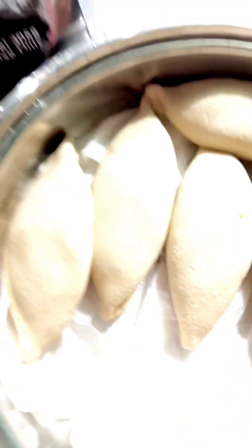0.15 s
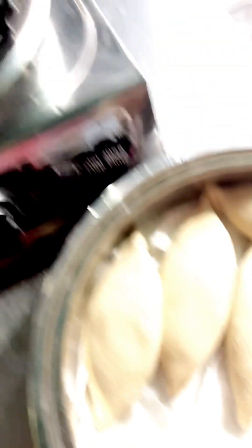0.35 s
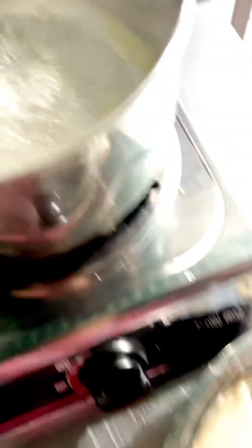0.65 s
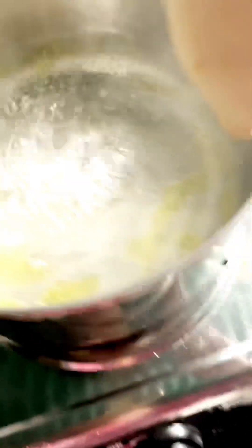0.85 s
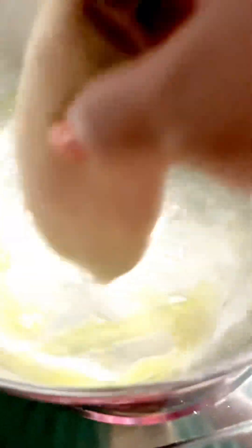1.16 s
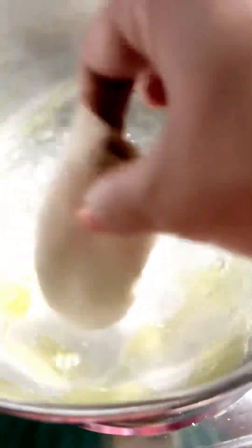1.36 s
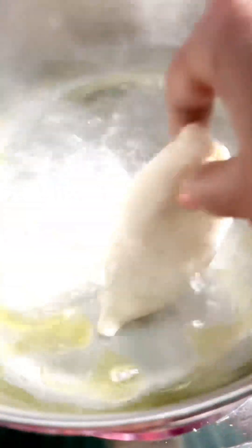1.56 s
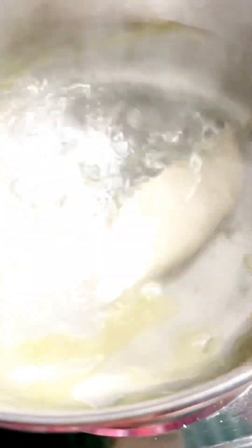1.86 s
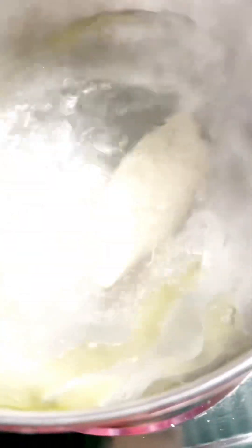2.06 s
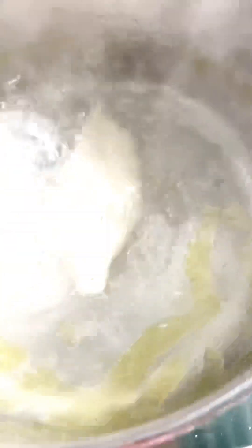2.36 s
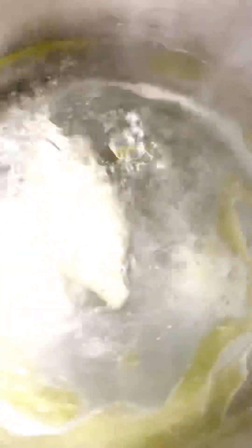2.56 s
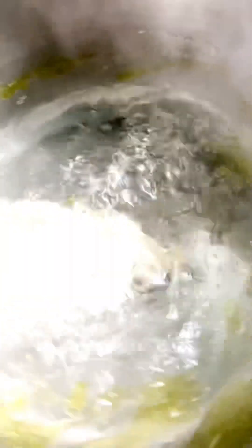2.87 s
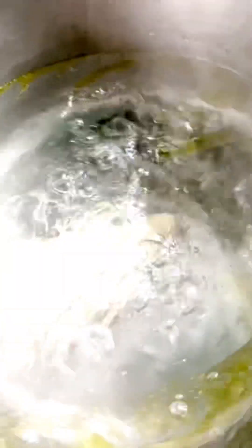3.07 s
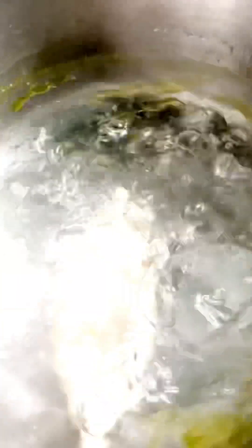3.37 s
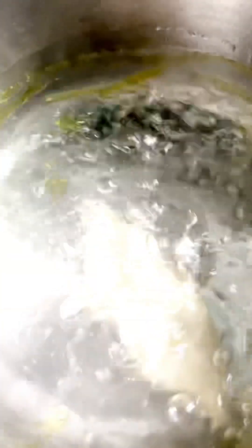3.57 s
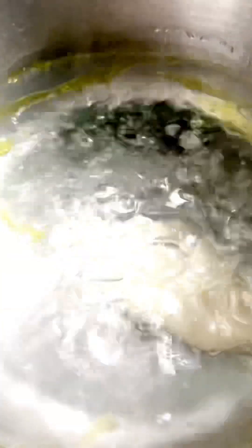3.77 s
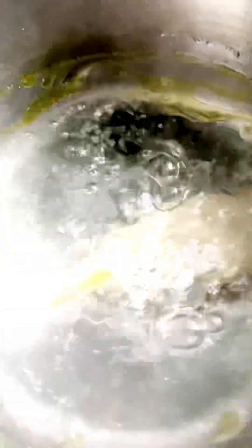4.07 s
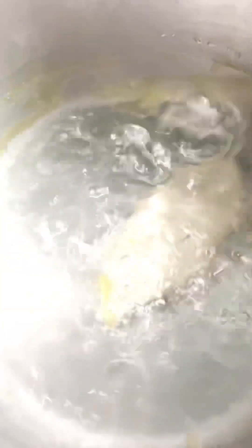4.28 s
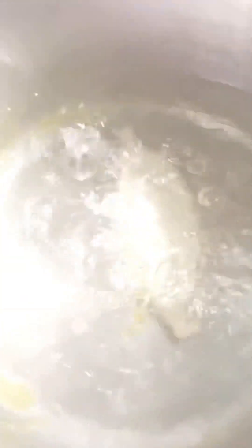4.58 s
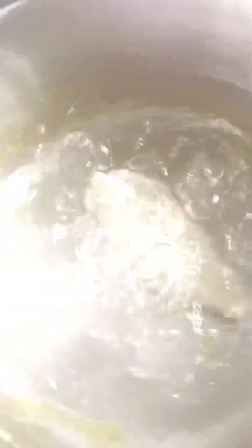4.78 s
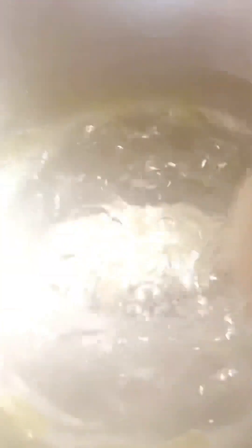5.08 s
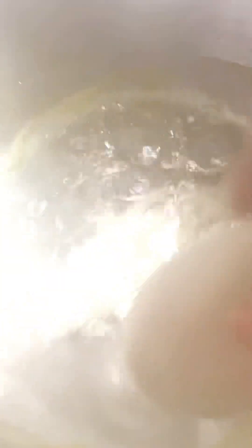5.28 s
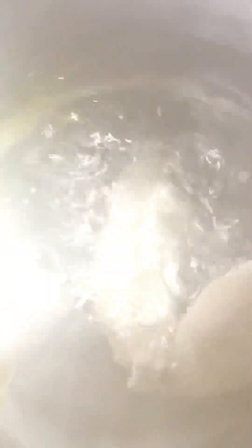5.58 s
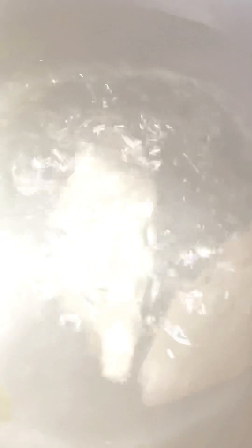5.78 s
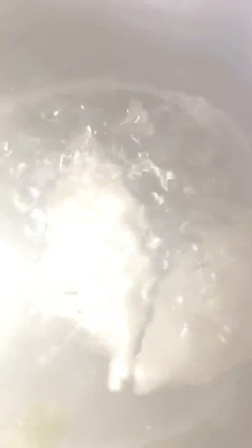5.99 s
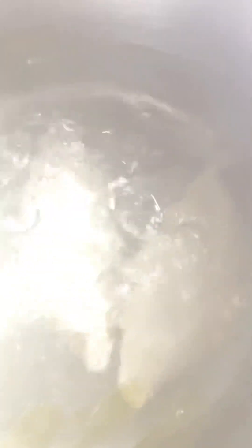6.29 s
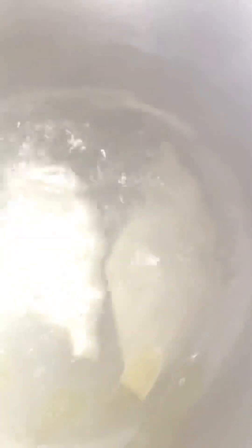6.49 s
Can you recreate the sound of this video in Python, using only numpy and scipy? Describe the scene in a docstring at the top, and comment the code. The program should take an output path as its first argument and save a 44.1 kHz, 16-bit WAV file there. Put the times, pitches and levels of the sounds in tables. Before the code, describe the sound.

Low machine hum pulses beneath the steady muffled rush of boiling water, dotted with brief rounded bubble plops and a faint high whine.

```python
"""A soft, dense wash of boiling is heard at once: a pot on a burner, dumplings being slipped in.
Filtered noise makes the wash; decaying, rising sines make its small bubbles and the larger gulps.
Under it a fan throbs against a second, steadier motor (likely a fridge compressor): sines locked to
two shafts beat, and high orders of the second whine faintly. Noise makes spatter, air and hiss."""
import sys
import numpy as np
from scipy import signal
from scipy.fft import rfft, irfft
from scipy.io import wavfile

SR = 44100
rng = np.random.default_rng(int(sys.argv[2]) if len(sys.argv) > 2 else 0)


def to_wav(sig):
    """Store sig (one row per channel, or 1-D mono) as 16-bit WAV at the path in sys.argv[1].

    Samples outside -1..1 are clipped; the rate is SR.
    """
    pcm = np.clip(np.atleast_2d(sig), -1, 1) * 32767
    pcm = np.round(pcm).astype(np.int16)
    wavfile.write(sys.argv[1], SR, pcm.T)  # frames by channels


N = 292568
T = np.arange(N) / SR  # s
HZ = np.fft.rfftfreq(N, 1 / SR)


def amp(db):
    """Decibels to gain."""
    return 10 ** (np.asarray(db) / 20)


def unit(x):
    """Scales to rms 1."""
    return x / np.sqrt(np.mean(x ** 2) + 1e-30)


def curve(rows, axis=1):
    """Joins one column of (s, value, ..) rows by straight lines."""
    columns = np.transpose(rows)
    return np.interp(T, columns[0], columns[axis])


def read(points, hz):
    """Reads a spectrum on a log-frequency axis."""
    f, value = np.transpose(points)
    return np.interp(np.log(hz + 1), np.log(f + 1), value)


def colour(x, db):
    """Filters by a gain in dB for each frequency; rms 1."""
    return unit(irfft(rfft(x) * amp(db), N))


def noise(db):
    """White noise coloured by a gain in dB for each frequency; rms 1."""
    return colour(rng.standard_normal(N), db)


def drift(points_per_s):
    """Random wander of about rms 1: straight lines between random points."""
    points = rng.standard_normal(256)
    return np.interp(T * points_per_s, np.arange(256), points) * np.sqrt(3 / 2)


def tone(turns, db):
    """A sine of the given rms level."""
    return np.sqrt(2) * amp(db) * np.sin(2 * np.pi * turns)


def add(mix, s, sound):
    """Adds a sound into the mix at time s."""
    part = mix[max(round(s * SR), 0):][:len(sound)]
    part += sound[:len(part)]


def small_bubbles(bubbles_per_s=900, spread_db=3, cycles=11):
    """Each bubble rings at its pitch, decays over a set number of cycles and rises in pitch."""
    pitches_hz = np.geomspace(350, 7000, 30)
    bubbles = np.zeros(N)
    for hz in pitches_hz:
        age = T[:4096] * hz / cycles  # in decay times
        envelope = np.exp(-age) * (1 - np.exp(-8 * age))
        ring = np.sin(2 * np.pi * cycles * (age + 0.0305 * age ** 2)) * envelope
        size = amp(spread_db * np.minimum(rng.exponential(1, N), 4))
        births = rng.random(N) < bubbles_per_s / len(pitches_hz) / SR
        bubbles += hz * signal.oaconvolve(size * births, ring)[:N]
    return bubbles


# Wash of the boil. Each row: frequency in Hz, relative density in dB per Hz.
WASH_SPECTRUM = [(150, -14), (280, 1.5), (500, -1.5), (630, -7), (950, -9), (1200, -13), (1900, -18.5),
                 (2750, -30.5), (4200, -31.5), (5600, -40.5), (8500, -42.5), (10400, -55.5), (16000, -73)]
# Hollow resonances of pot and stove. Each row: frequency in Hz, width in Hz, lift in dB.
HOLLOWS = [(339, 17, 1.5), (458, 87, 4), (754, 68, 6.5), (878, 29, 4), (976, 16, 5.5), (1043, 27, 6.5),
           (1290, 41, 4)]
# Brightness of the boil, before its flicker. Each row: time in seconds, treble lift in dB.
TREBLE_LIFT = [(0, 2.5), (1.5, 1.5), (4.6, 1.05), (6.63, 2.5)]


def boil(level_db=-50.5, wash_db=0.0, bubbles_db=-9, surge_db=0.01, fizz_db=0.25):
    """Countless bubbles merge into a wash; nearer ones ring out. The pot colours both."""
    shape_db = read(WASH_SPECTRUM, HZ)
    for hz, width_hz, lift_db in HOLLOWS:
        shape_db = shape_db + lift_db / (1 + (2 * (HZ - hz) / width_hz) ** 2)
    wash = amp(wash_db) * noise(shape_db)
    water = wash + amp(bubbles_db) * colour(small_bubbles(), shape_db)
    highpass = signal.butter(1, 1300, "high", fs=SR, output="sos")
    treble = signal.sosfiltfilt(highpass, water)
    lift = amp(curve(TREBLE_LIFT) + fizz_db * drift(1.8))
    return (water + (lift - 1) * treble) * amp(level_db + surge_db * drift(3))


# Brief wobbles of the drone's level. Each row: centre in seconds, change in dB.
DRONE_WOBBLES = [(.24, -9), (.41, 3), (.59, -7), (.82, 2.5), (2.42, -4), (2.69, 0), (3.66, 4), (5.52, -3.5)]


def drone_level_db(speed, base_db=-36, usual_turns_per_s=24.045, swell_db_per_turn_s=6,
                   wobble_s=0.048, flutter_db=0.6, flutter_points_per_s=11):
    """The drone swells as the shaft slows, with a light flutter and brief wobbles."""
    level_db = base_db + swell_db_per_turn_s * (usual_turns_per_s - speed)
    level_db += flutter_db * drift(flutter_points_per_s)
    for s, change_db in DRONE_WOBBLES:
        level_db += change_db * np.exp(-((T - s) / wobble_s) ** 2)
    return level_db


# Fan shaft. Each row: time in seconds, speed in turns per second.
FAN_SPEED = [(0.0, 24.14), (0.35, 24.74), (0.7, 24.07), (1.2, 23.95), (1.7, 23.56), (2.1, 24.47),
             (3.25, 24.37), (3.9, 23.82), (4.35, 23.45), (4.9, 23.98), (5.6, 24.14), (6.25, 24.11),
             (6.63, 23.71)]
# Fan tones besides the drone. Each row: multiple of shaft speed, mean rms level in dB.
FAN_ORDERS = [(1, -50.5), (3, -46.2), (4, -44.2), (5, -49.3), (6, -60), (6.26, -53.5)]
# Compressor hum. Each row: multiple of shaft speed, mean rms level in dB.
MOTOR_HUM = [(3, -47.7), (4, -47), (5, -54)]


def machines(motor, in_step_s=1.079, waver_db=0.66):
    """Two shafts at nearly the same speed: their like orders beat, faster the higher they are."""
    speed = curve(FAN_SPEED)
    fan = np.cumsum(speed) / SR  # turns made
    fan -= np.interp(in_step_s, T, fan - motor)  # shafts in step here: the shared hum peaks
    path = rng.random(16)  # the room delays like orders of both machines alike
    out = tone(2 * fan + rng.random(), drone_level_db(speed))
    for shaft, orders in ((fan, FAN_ORDERS), (motor, MOTOR_HUM)):
        for order, db in orders:
            out += tone(order * shaft + path[round(order)], db + waver_db * drift(1.1))
    return out


WHISTLE_ORDER = 171
# Sharpest compressor order, which sets its speed.
# Each row: time in seconds, pitch in Hz, rms level in dB.
WHISTLE = [(0.15, 3978, -82), (0.38, 3967, -86), (0.48, 3944, -81), (0.76, 3976, -81), (3.6, 3974, -83),
           (4.38, 3972, -77.5), (6.41, 3965, -78.5), (6.45, 3958, -78)]


def compressor_shaft():
    """Turns made by the compressor, whose speed wanders slightly."""
    return np.cumsum(curve(WHISTLE) / WHISTLE_ORDER) / SR


def whistle(shaft):
    """The sharpest shaft order, a sine locked to the compressor."""
    return tone(WHISTLE_ORDER * shaft, curve(WHISTLE, axis=2))


# Compressor whine. Each row: multiple of shaft speed, rms level in dB before trim and fading.
MOTOR_WHINE = [(20, -66), (24, -67), (32, -75), (51, -80), (63, -79), (136, -89), (139, -90), (140, -92),
               (150, -89), (151, -91), (155, -89), (156, -92), (162, -89), (163, -88), (164, -89),
               (166, -85), (177, -92), (182, -90), (183, -93), (207, -96), (252, -101), (288, -100),
               (297, -101), (329, -100)]


def whine(shaft, trim_db=-0.5, fade_db=2):
    """High shaft orders fade in and out as the microphone moves through standing waves."""
    out = np.zeros(N)
    for order, db in MOTOR_WHINE:
        out += tone(order * shaft + rng.random(), db + trim_db + fade_db * drift(1.7))
    return out


# Weak orders between those. Each row: frequency in Hz, peak level of each order in dB
# before scatter, trim and fading.
WEAK_ORDERS = [(2000, -99.5), (3000, -102), (3850, -91), (4050, -100), (4500, -100), (5800, -110),
               (7500, -110), (8900, -108), (10300, -117)]


def weak_orders(shaft, scatter_db=4, trim_db=-1.5, fade_db=2):
    """Many weak orders buzz, repeating every turn; two such patterns fade independently."""
    orders, angle = np.arange(2049), np.arange(4096) / 4096
    hz = orders * shaft[-1] / T[-1]
    strong = [WHISTLE_ORDER] + [order for order, _ in MOTOR_WHINE]
    in_band = (hz > WEAK_ORDERS[0][0]) & (hz < WEAK_ORDERS[-1][0])
    heard = in_band & ~np.isin(orders, strong)
    level = heard * amp(read(WEAK_ORDERS, hz) + rng.uniform(-scatter_db, scatter_db, len(hz)))
    out = np.zeros(N)
    for _ in range(2):
        phases = np.exp(2j * np.pi * rng.random(len(hz)))
        turn = irfft(level * phases) * len(angle) / 2
        out += np.interp(shaft, angle, turn, period=1) * amp(fade_db * drift(2.0) + trim_db)
    return out


# Electrical tones. Each row: frequency in Hz, mean rms level in dB.
ELECTRICAL_TONES = [(100, -59), (1962, -84), (2400, -87)]


def electrical_tones(fade_db=2):
    """Sines of fixed pitch whose levels fade as the microphone moves through standing waves."""
    out = np.zeros(N)
    for hz, db in ELECTRICAL_TONES:
        out += tone(hz * T + rng.random(), db + fade_db * drift(2))
    return out


# Rumble of moving air. Each row: frequency in Hz, relative density in dB per Hz.
RUMBLE_SPECTRUM = [(10, -28), (30, -18), (40, -8), (57, 1.5), (85, -.5), (135, -4), (160, -7), (178, -5.5),
                   (195, -8), (222, -7.5), (245, -19), (400, -36), (1500, -90)]


def air(rumble_db=-43.5, swell_db=-0.07):
    """Turbulent air around fan and burner: low, nearly steady noise."""
    return noise(read(RUMBLE_SPECTRUM, HZ)) * amp(rumble_db + swell_db * drift(3.3))


# Larger bubbles and gulps. Each row: start in seconds, starting pitch in Hz, peak level in dB,
# length in seconds.
GULPS = [(.565, 457, -45, 0.13), (.57, 1840, -61, 0.065), (0.572, 1640, -64, .05),
         (1.421, 440.5, -50, 0.085), (2.815, 1370, -58, 0.04), (2.81, 1760, -61, 0.043),
         (2.82, 900, -52, 0.029), (2.93, 900, -54, 0.075), (3.91, 470, -47, 0.055), (4.16, 739, -53, 0.054),
         (4.666, 766.4, -51, 0.062), (5.26, 1328, -58.5, 0.075), (6.34, 477.4, -49, 0.12)]


def gulps(rise=0.013):
    """Large bubbles swell and sing briefly, their pitch rising by the given fraction."""
    out = np.zeros(N)
    for s, hz, db, length_s in GULPS:
        u = T[:round(length_s * SR)] / length_s
        ring = np.sin(2 * np.pi * hz * length_s * (u + rise * u ** 2 / 2))
        add(out, s, amp(db) * np.sin(np.pi * u) * ring)
    return out


# Spatters at the surface. Each row: start in seconds, rms level in dB before the envelope,
# decay in seconds.
SPATTERS = [(.59, -68, 0.065), (2.072, -57, 0.0039), (2.34, -60, 0.027), (2.821, -60.5, 0.067)]
# Their colour. Each row: frequency in Hz, relative density in dB per Hz.
SPATTER_SPECTRUM = [(400, -24), (1000, 1), (1800, 3), (2800, -9), (5000, -20), (9000, -32), (16000, -50.5)]


def spatters():
    """Short bursts of spray: coloured noise with a quick attack and exponential decay."""
    out = np.zeros(N)
    spray = noise(read(SPATTER_SPECTRUM, HZ))
    for s, db, decay_s in SPATTERS:
        age = np.maximum(T - s, 0) / decay_s
        out += amp(db) * spray * np.exp(-age) * (1 - np.exp(-10 * age))
    return out


def scene():
    """All sources at one microphone."""
    motor = compressor_shaft()
    compressor = whistle(motor) + whine(motor) + weak_orders(motor)
    water = boil() + gulps() + spatters()
    return (water + machines(motor) + compressor + electrical_tones() + air())[None]


# Microphone hiss. Each row: frequency in Hz, relative density in dB per Hz.
HISS_SPECTRUM = [(100, -6), (9000, -5), (10500, -9), (12300, -2), (14800, -3), (16000, -6)]


def record(dry, hiss_db=-83, edge_hz=15750):
    """Microphone hiss, then a steep low-pass as the band limit."""
    wet = dry + amp(hiss_db) * noise(read(HISS_SPECTRUM, HZ))
    lowpass = signal.firwin(1023, edge_hz, window=("kaiser", 9), fs=SR)
    return signal.oaconvolve(wet, lowpass[None], "same")


dry = scene()
out = record(dry)
to_wav(out)
```